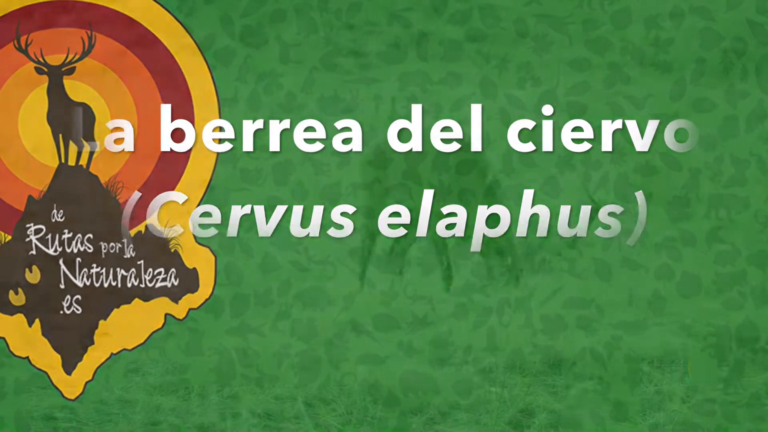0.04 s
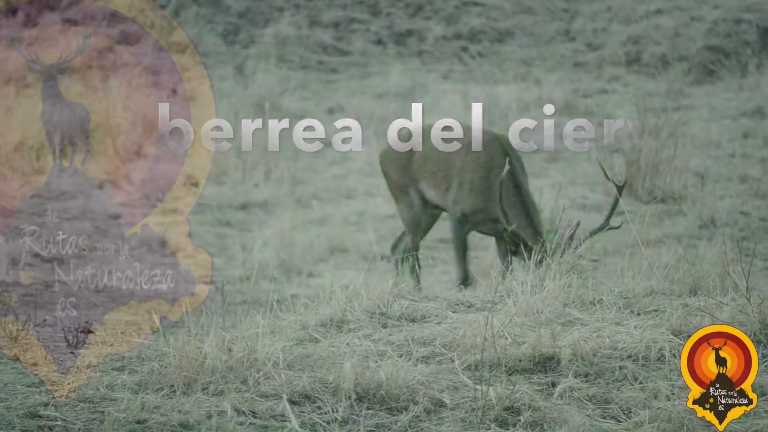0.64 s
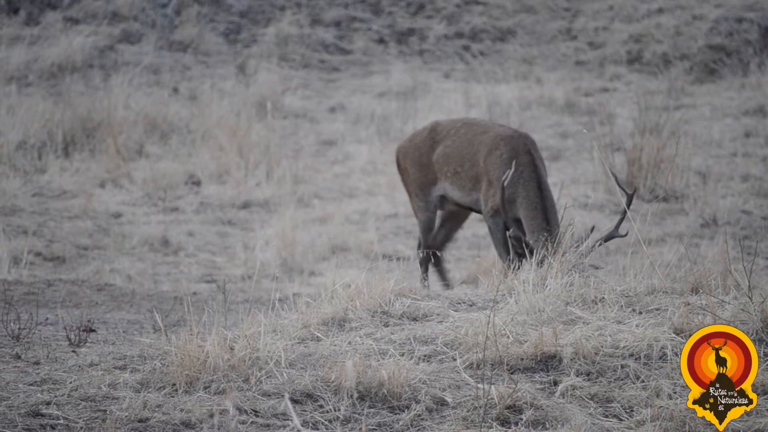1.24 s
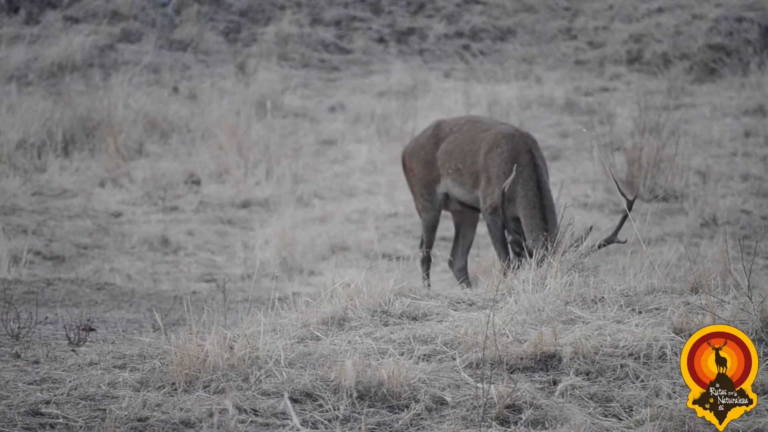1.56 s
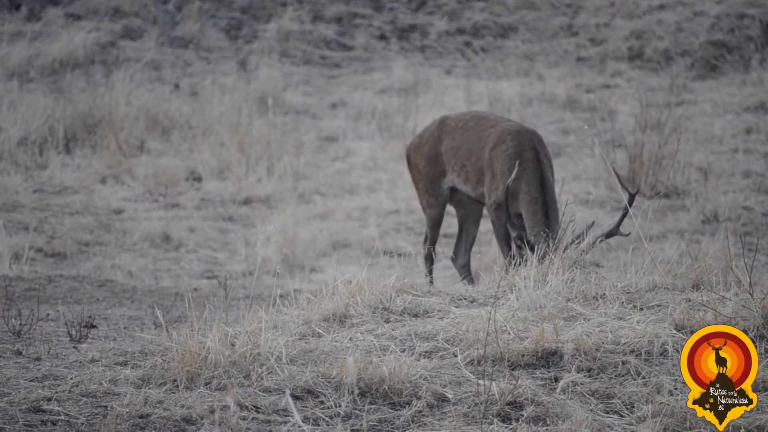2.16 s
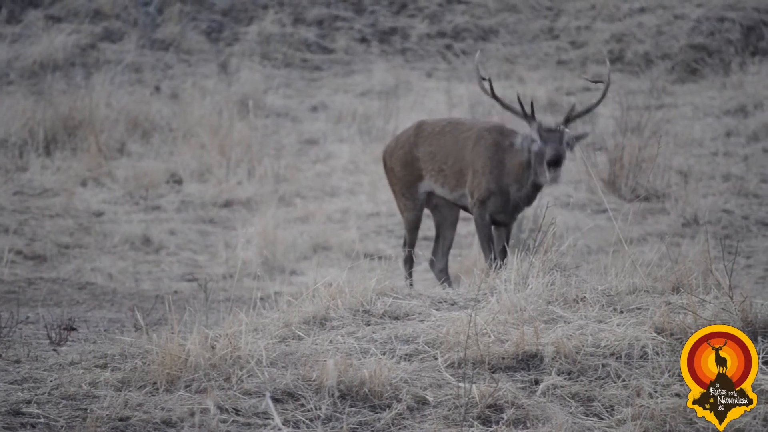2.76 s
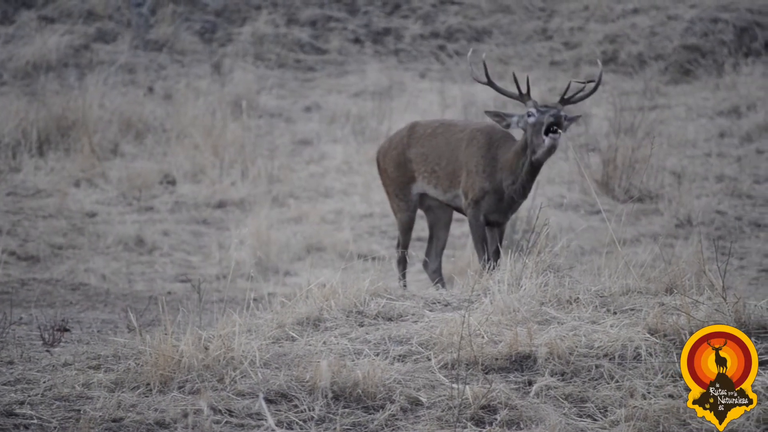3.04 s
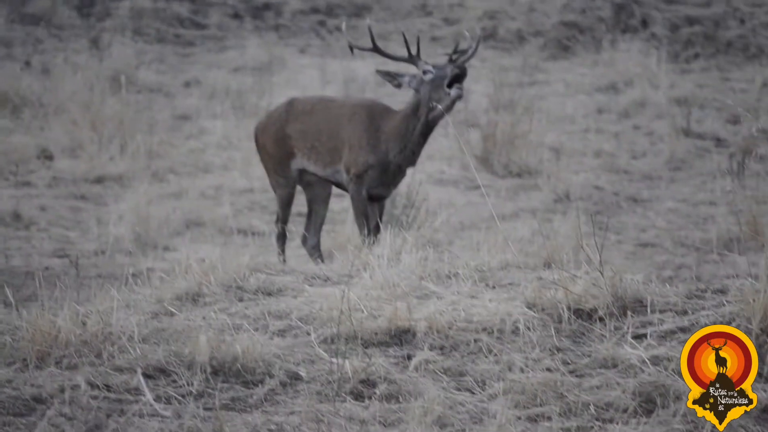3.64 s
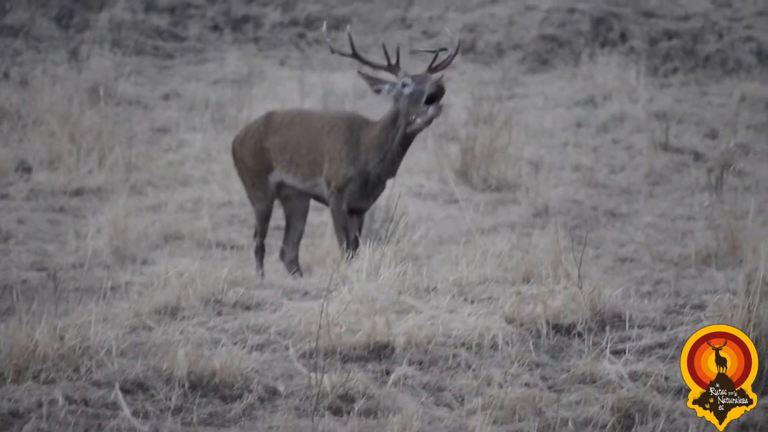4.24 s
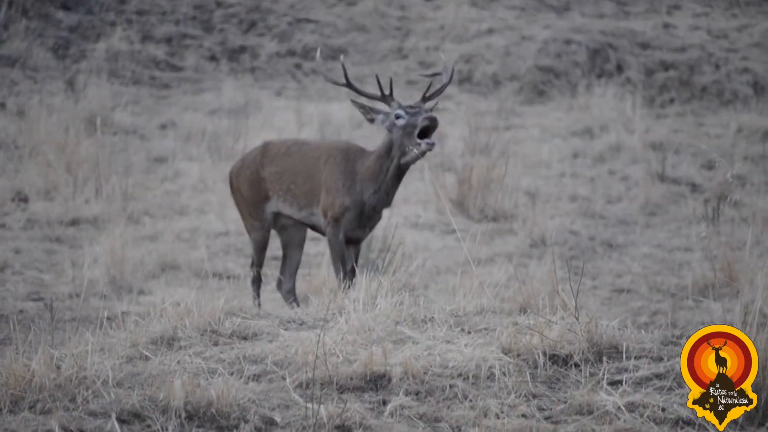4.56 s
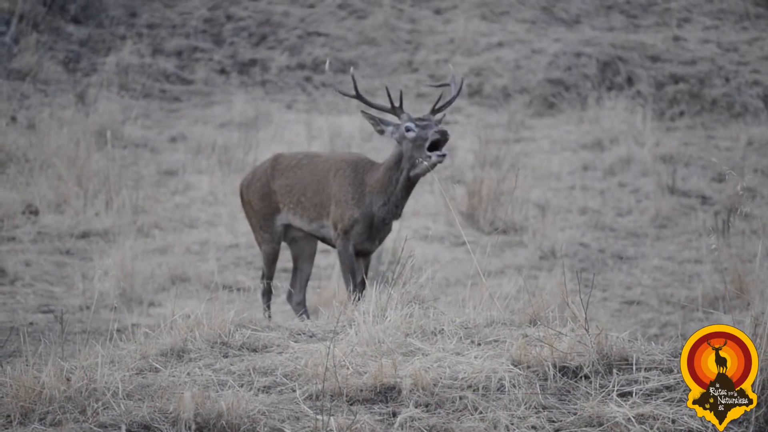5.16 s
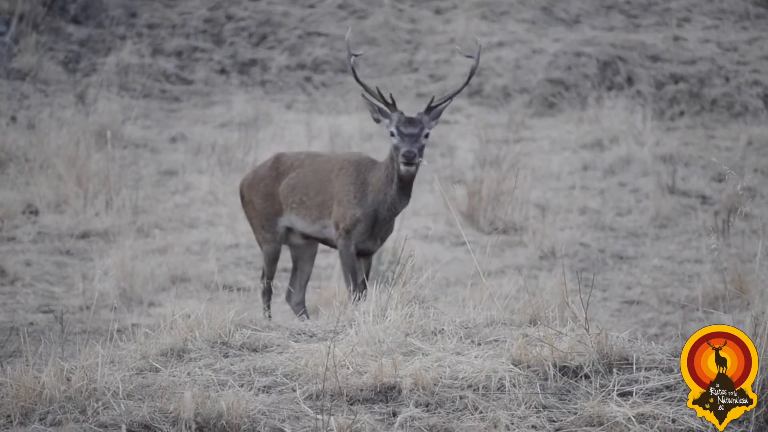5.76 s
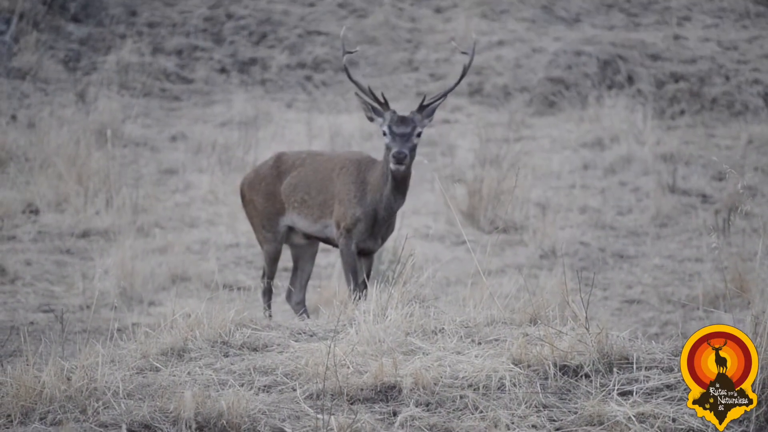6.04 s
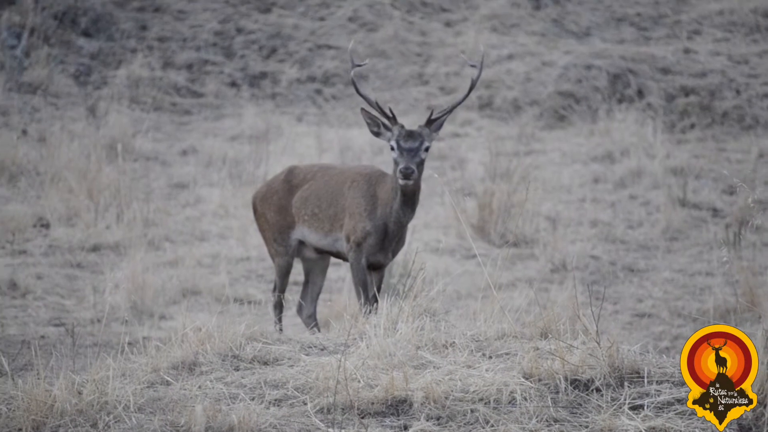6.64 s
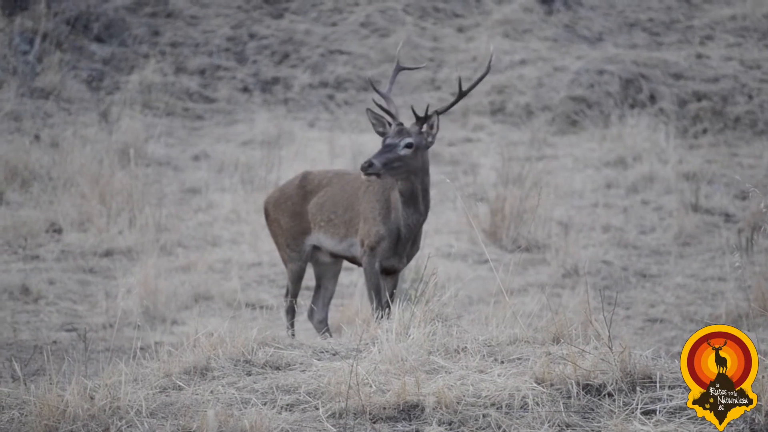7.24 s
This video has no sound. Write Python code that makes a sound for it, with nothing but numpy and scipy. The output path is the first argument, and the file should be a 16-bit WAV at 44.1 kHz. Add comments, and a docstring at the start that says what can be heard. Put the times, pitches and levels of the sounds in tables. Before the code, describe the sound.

A faint, steady rush of wind in the grass fades in during the first second on an open field. A distant small bird gives two barely audible chirps, and a very faint, thin high whine stays at the microphone throughout. At about 2.1 seconds a red deer stag starts a single roar from across the field. It begins as a muffled hum, opens at 2.5 seconds and climbs with small cracks in the voice. From about 2.9 to 3.5 seconds it is loud, harsh and at its highest. The pitch then steps down, settling at 4.3 seconds on a long, lower, cleaner and somewhat softer note. This picks up a slight rasp and ends in a falling grunt at about 5.4 seconds. A weak echo comes back from a hillside. The wind continues alone, with one more faint chirp near 7.3 seconds.

```python
"""Faint wind in the grass fades in on an open field, with a far bird and the camera's own thin whine.
Two seconds in, a red deer stag roars once across the field, his vocal folds pulsing through the
formants of his throat. The voice climbs from a closed-mouth hum, breaks into harsh chaos at the top,
sinks to a long clean note and ends in a falling grunt. A weak echo comes back to the microphone
from the hillside, and the bird chirps once more over the wind."""
import sys
import numpy as np
from scipy import signal
from scipy.fft import rfft, irfft, next_fast_len
from scipy.io import wavfile
from scipy.ndimage import map_coordinates

SR = 44100
rng = np.random.default_rng(int(sys.argv[2]) if len(sys.argv) > 2 else 0)


def generate_wav(sig):
    """Save sig (samples, or channels by samples) to the path in sys.argv[1] as 16-bit PCM at SR."""
    pcm = np.round(np.clip(np.atleast_2d(sig).T, -1, 1) * 32767).astype(np.int16)
    wavfile.write(sys.argv[1], SR, pcm)


N = 322371
T = np.arange(N) / SR

# wind in the grass of the field: (frequency [Hz], relative level [dB])
GRASS_SPECTRUM = [(14, -33.5), (24, -7.5), (32, -16), (81, -5.5), (171, -5.5), (243, -7), (406, -4),
                  (440, -3.5), (911, -5.5), (988, -6.5), (1190, -6), (2680, -13.5), (5540, -27.5),
                  (13800, -35.5), (15000, -38)]
# far-off drones in the wind: (centre [Hz], half-width [Hz], boost [dB])
WIND_DRONES = [(348, 15, 6), (407.4, 38, 7), (1035, 75, 4)]
# a small bird far from the microphone: (time [s], length [s], start pitch [Hz], top [Hz], level [dB])
CHIRPS = [(.15, .065, 3900, 4330, -72), (0.44, 0.038, 3500, 4470, -72), (7.258, 0.042, 3200, 4360, -72)]
# the stag's folds climb, crest, step down through their registers and let go: (time [s], pitch [Hz])
PITCH = [(2.1, 201.2), (2.2, 210.1), (2.477, 226.8), (2.55, 237), (2.565, 247.5), (2.62, 249.8),
         (2.681, 283.2), (2.739, 290.5), (2.792, 325.3), (2.86, 332.4), (2.888, 362.6), (3.411, 341.5),
         (3.44, 323), (3.51, 314.6), (3.534, 295.3), (3.759, 280.4), (3.77, 265.1), (3.976, 253.2),
         (3.994, 239.3), (4.104, 226.4), (4.184, 209.8), (4.237, 194.4), (4.3, 186.3), (4.43, 183.8),
         (4.702, 192.4), (4.971, 195.3), (5.219, 190.4), (5.301, 177.6), (5.36, 149.5), (5.441, 115.9)]
# how hard he pushes, how sharply the folds close: (time [s], effort [dB], brightness [dB/octave])
EFFORT = [(2.15, -62.5, -8), (2.48, -54, -10), (2.495, -49.5, -6), (2.65, -39, 0.5), (2.85, -30, 2.5),
          (2.9, -32.5, 0.6), (3.42, -34.5, 0), (3.48, -30, -3.5), (3.56, -30, -6.5), (3.755, -34, -11),
          (3.775, -29, -3), (3.97, -36.5, -4.0), (4.02, -35.5, -7.5), (4.1, -34.5, -3), (4.2, -40, -4.5),
          (4.3, -41, -4.5), (4.65, -40.5, -1.6), (5.0, -42, -3.5), (5.33, -41.5, -2.6), (5.42, -59.5, -3.5)]
# low formants; a harmonic flares as it glides through one: (centre [Hz], width [Hz], relative level [dB])
LOW_FORMANTS = [(243.2, 51.2, 0.2), (392.3, 24, -5), (639.3, 99, 0.5), (961.2, 46.2, 5.5), (1312.4, 63, 7),
                (1588, 387, -1), (1640, 79, -2.5), (2090, 57, -1)]
# high formants that give the voice its edge: (centre [Hz], width [Hz], relative level [dB])
HIGH_FORMANTS = [(2450, 67, 3.5), (3007, 580, 0), (3281, 175, 6), (3427, 290, -11), (3974, 130, -9.5),
                 (4357, 110, -10.5), (4790, 240, -15), (5360, 310, -23), (5800, 250, -26)]
# larynx and neck change the throat's length, moving the low formants: (time [s], frequency [ratio])
THROAT_TUNING = [(2.47, 0.97), (2.65, 1.053), (2.87, 1.066), (3.45, 1.0074), (3.75, 0.96), (4.0, 0.97),
                 (4.2, 0.99), (4.35, 1.006), (4.7, 1.02), (5.0, 1.007), (5.3, 1.02)]
# dips from the ground bounce and between the formants: (centre [Hz], half-width [Hz], gain [dB])
DIPS = [(465, 70, -5), (2700, 150, -6), (3070, 60, -5), (4200, 100, -6), (4620, 130, -4), (6050, 250, -8)]
# as the voice cracks, one overtone leaps out: (middle [s], length [s], centre [Hz], boost [dB])
YODELS = [(2.332, 0.034, 1300, 13), (2.431, 0.046, 1105, 24.5), (2.504, 0.04, 1607, 19.5),
          (2.614, 0.058, 1805, 15), (2.681, 0.021, 1720, 11), (2.713, 0.029, 2010, 16),
          (2.857, .02, 1680, 4), (3.454, .032, 1865, 15.5), (3.983, 0.022, 1780, 16),
          (4.089, .034, 1836, 10.5), (4.224, 0.058, 1684, 12.5)]
# the middle of the voice goes hollow for a moment: (middle [s], length [s], gain [dB])
HOLLOWS = [(2.514, 0.045, -7), (2.661, 0.023, -5.5), (2.777, 0.021, -13), (4.036, .065, -19),
           (4.257, .035, -7.5), (5.021, 0.38, -4)]
# echo from the hillside: (frequency [Hz], time to fall 60 dB [s])
HILLSIDE_DECAY = [(200, 0.97), (1000, 0.77), (4000, 0.057), (10000, 0.022)]
# overtones above the formants: (frequency [Hz], relative level [dB])
SIZZLE_SPECTRUM = [(5500, -25), (6300, -12.5), (6700, -22), (7200, 2), (7800, -14), (8400, 5.5), (9400, -6),
                   (10400, -5), (11500, -10.5), (12800, -36)]
# the folds catch where the voice changes register: (time [s], extra jitter [rad])
CATCHES = [(2.644, 0.082), (2.775, .06), (3.765, 0.049), (3.991, 0.06), (4.089, 0.11), (4.238, 0.063)]
# harsh spells of the folds: (start [s], end [s], chaos share [0-1], extra jitter [rad])
HARSH_SPELLS = [(2.881, 3.425, 0.39, 0.17), (3.445, 3.528, 0.03, 0.07), (5.35, 5.48, 0.25, 0.084)]
# slower swings below each harmonic in chaos: (offset [x pitch], flutter rate [1/s], relative level [dB])
SIDEBANDS = [(.17, 40.42, 10.5), (.31, 45.92, 8)]
# on the long note, alternate pulses fall out of step: (middle [s], length [s], level [dB])
RASPS = [(4.692, 0.16, -53.5), (5.02, 0.15, -48.5), (5.186, 0.14, -46.5), (5.341, 0.056, -41)]
# resonances that colour the rasp: (centre [Hz], width [Hz], relative level [dB])
RASP_BANDS = [(1580, 553, -4.5), (3000, 720, -17.5)]


def amp(db):
    """Decibels to gain."""
    return 10 ** (np.asarray(db) / 20)


def unit(x):
    """Scale to rms 1."""
    return x / np.sqrt(np.mean(np.abs(x) ** 2) + 1e-20)


def along(points, hz):
    """(frequency [Hz], value) points read on a log axis."""
    freqs, values = np.transpose(points)
    return np.interp(np.log(hz + 1), np.log(freqs), values)


def curves(rows, t):
    """Each column after the time, read at the times t."""
    times, *columns = np.transpose(rows)
    return [np.interp(t, times, column) for column in columns]


def wobble(rate, t):
    """A smooth random curve of rms 1, rate knots a second."""
    at = (t - t[0]) * rate
    return unit(map_coordinates(rng.standard_normal(int(at[-1]) + 4), [at + 1]))


def filtered(x, response):
    """Shape x by a gain that depends on frequency."""
    size = next_fast_len(N + 8192)
    return irfft(rfft(x, size) * response(np.fft.rfftfreq(size, 1 / SR)), size)[:N]


def hump(hz, centre, width):
    """Power response of a steep-sided resonance."""
    return 1 / (1 + np.abs(2 * (hz - centre) / width) ** 2) ** 2


def bands_db(bands, hz):
    """Summed boosts or dips in dB."""
    return sum(db * hump(hz, centre, 2 * half_width) for centre, half_width, db in bands)


def resonances(bands, hz):
    """Summed power of several resonances."""
    return sum(amp(db) ** 2 * hump(hz, centre, width) for centre, width, db in bands)


def bell(t, middle, length):
    """A brief swell from 0 to 1 and back."""
    return np.exp(-(2 * (t - middle) / length) ** 2)


def wind(level_db=-63, waver_db=0.45):
    """A steady rush in the grass with a few far drones, wavering slightly in level."""
    colour = lambda hz: amp(along(GRASS_SPECTRUM, hz) + bands_db(WIND_DRONES, hz))
    rush = unit(filtered(rng.standard_normal(N), colour))
    return rush * amp(level_db + waver_db * wobble(7.7, T))


def camera_whine(hz=15695.5, level_db=-71):
    """The camera's thin, steady tone at the microphone."""
    return amp(level_db) * np.sin(2 * np.pi * hz * T)


def bird():
    """Far off, each chirp slides up and holds its top note."""
    song = np.zeros(N)
    for start, length, start_hz, top_hz, db in CHIRPS:
        progress = np.clip((T - start) / length, 0, 1)
        hz = start_hz + (top_hz - start_hz) * np.sin(np.pi * np.minimum(progress, .5))
        song += amp(db) * np.sin(np.pi * progress) * np.sin(2 * np.pi * np.cumsum(hz) / SR)
    return song


def stag(harmonic_count=52, fade_s=0.043):
    """Fold pulses from across the field: harmonics shaken by jitter and chaos, shaped by the throat."""
    start, end = PITCH[0][0], PITCH[-1][0]
    sounding = (T > start) & (T < end)
    t = T[sounding]
    frames = np.arange(start, end, .003)
    pitch = curves(PITCH, t)[0]
    phase = 2 * np.pi * np.cumsum(pitch) / SR
    chaos, jitter = harshness(t)
    steady, wild = np.sqrt(1 - chaos), np.sqrt(chaos)
    swing = swings(phase, t)
    fundamental = np.exp(1j * (phase + jitter * wobble(260, t)))  # jitter smears high harmonics most
    harmonic_hz = np.arange(1, harmonic_count + 1)[:, None] * curves(PITCH, frames)[0]
    gains = throat(harmonic_hz, frames) * shimmer(harmonic_hz, frames)
    partial, voice = 1, rasp(phase, pitch, t)
    for gain in gains:
        partial = partial * fundamental  # the next harmonic up
        swing = np.roll(swing, SR // 20)  # each beats in its own way, so the sum stays dense
        voice += (np.interp(t, frames, gain) * partial * (steady + wild * swing)).real
    roar = np.zeros(N)
    roar[sounding] = voice * np.clip(np.minimum(t - start, end - t) / fade_s, 0, 1)
    return filtered(roar, lambda hz: amp(bands_db(DIPS, hz)))


def throat(hz, t, edge_db=-13, tilt_from_hz=1190, pivot_hz=1390, top_hz=5940):
    """Complex gain of each harmonic (rows of hz) as he pushes it through the formants."""
    effort_db, brightness_db = curves(EFFORT, t)
    chaos = harshness(t)[0]
    smeared_hz = hz - 0.21 * chaos * hz[0]  # chaos smears each harmonic downward
    tuned_hz = smeared_hz / curves(THROAT_TUNING, t)[0]
    widen = 1 + 1.8 * chaos  # leaky, flailing folds damp the low formants
    power = sum(amp(db) ** 2 * hump(tuned_hz, centre, width * widen) ** 0.88
                for centre, width, db in LOW_FORMANTS) / widen
    power += amp(edge_db) ** 2 * resonances(HIGH_FORMANTS, hz)
    tilt_db = brightness_db * np.log2(np.maximum(hz, tilt_from_hz) / pivot_hz)
    power *= amp(effort_db + tilt_db + mouth_and_cracks(hz, t)) ** 2
    power /= 1 + (hz / top_hz) ** 16  # only the sizzle lies higher
    # every formant delays the harmonics that it holds, so each pulse rings on
    lag = sum(np.arctan(2 * (hz - centre) / width) for centre, width, _ in LOW_FORMANTS + HIGH_FORMANTS)
    return np.sqrt(power + grunt(hz, t) + sizzle(hz, t, effort_db)) * np.exp(-1j * lag)


def mouth_and_cracks(hz, t, opens_s=2.487, muffled_db=-12.5, muffled_above_hz=320):
    """Gain in dB: the closed mouth muffles the hum; the cracking voice yodels and goes hollow."""
    muffled = muffled_db * (t < opens_s) * (hz > muffled_above_hz)
    leaps = sum(db * bell(t, middle, length) * hump(hz, centre, width=440)
                for middle, length, centre, db in YODELS)
    hollow_db = sum(db * bell(t, middle, length) for middle, length, db in HOLLOWS)
    return muffled + leaps + hollow_db * hump(hz, centre=1630, width=1020)


def shimmer(hz, t, depth_db=3.5):
    """Overtones above the low formants swell and fade, each on its own."""
    drift = np.array([wobble(7.04, t) for _ in hz])
    return amp(depth_db * drift * np.clip((hz - 2200) / 1800, 0, 1))


def hillside(roar, delay_s=.02):
    """The slope sends a diffuse, late answer to the microphone; the treble dies first."""
    hz, t, noise = signal.stft(rng.standard_normal(SR), SR, nperseg=256)
    decay = amp(-60 * t / along(HILLSIDE_DECAY, hz)[:, None])
    tail = signal.istft(noise * decay, SR, nperseg=256)[1]
    delayed = np.pad(roar, (round(delay_s * SR), 0))
    return signal.fftconvolve(delayed, tail / np.linalg.norm(tail))[:N]


def sizzle(hz, t, effort_db, peak_s=2.74, peak_db=-59, rise_db_per_s=261, fall_db_per_s=26.5):
    """Power of the top overtones: they flare as the roar opens, then die to a trace of the effort."""
    flare_db = peak_db - np.maximum(rise_db_per_s * (peak_s - t), fall_db_per_s * (t - peak_s))
    trace_db = effort_db - 50
    in_band = (hz > SIZZLE_SPECTRUM[0][0]) & (hz < SIZZLE_SPECTRUM[-1][0])
    colour = in_band * amp(along(SIZZLE_SPECTRUM, hz)) ** 2
    return amp(np.maximum(flare_db, trace_db)) ** 2 * colour / (colour.sum(axis=0) + 1e-20)


def harshness(t, clean_jitter_rad=0.0099, switch_s=0.005, catch_s=0.00096):
    """Chaos share and jitter of the folds as they catch or break into harsh spells."""
    gate = lambda start, end: np.clip(.5 + np.minimum(t - start, end - t) / switch_s, 0, 1)
    chaos = sum(share * gate(start, end) for start, end, share, _ in HARSH_SPELLS)
    spells = sum(extra * gate(start, end) for start, end, _, extra in HARSH_SPELLS)
    catches = sum(extra * np.exp(-((t - time) / catch_s) ** 2) for time, extra in CATCHES)
    return np.clip(chaos, 0, 1), clean_jitter_rad + spells + catches


def swings(phase, t):
    """In chaos the folds also swing in slower patterns that come and go at random; rms 1."""
    return unit(sum(amp(db) * (wobble(rate, t) + 1j * wobble(rate, t)) * np.exp(-1j * offset * phase)
                    for offset, rate, db in SIDEBANDS))


def rasp(phase, pitch, t, fuzz_rad=1.98):
    """Period doubling of the folds: fuzzy lines halfway between the harmonics."""
    level = sum(amp(db) * bell(t, middle, length) for middle, length, db in RASPS)
    on = level > 1e-5
    lines = 0
    for multiple in np.arange(5, 23) + .5:
        gain = np.sqrt(resonances(RASP_BANDS, multiple * pitch[on]))
        lines += gain * np.cos(multiple * phase[on] + fuzz_rad * wobble(60, t[on]))
    sound = np.zeros(len(t))
    sound[on] = unit(lines) * level[on]
    return sound


def grunt(hz, t, level_db=-41):
    """Power of the last slack beats of the folds, thumping in the chest."""
    thump = amp(level_db) * bell(t, middle=5.4, length=0.034)
    return thump ** 2 * hump(hz, centre=244, width=118)


def scene():
    """The field from one microphone: wind, the far bird, the stag and his faint echo."""
    roar = stag()
    echo = amp(-23) * hillside(roar)
    return (wind() + bird() + roar + echo)[None]


def record(dry, fade_s=0.72, top_hz=15900):
    """At the microphone the camera adds its whine; all fades in, and the highest treble is cut."""
    fade_in = np.minimum(0.052 + (T / fade_s) ** 1.35, 1)
    faded = (dry[0] + camera_whine()) * fade_in
    return filtered(faded, lambda hz: hz < top_hz)[None]


dry = scene()
out = record(dry)
generate_wav(out)
```